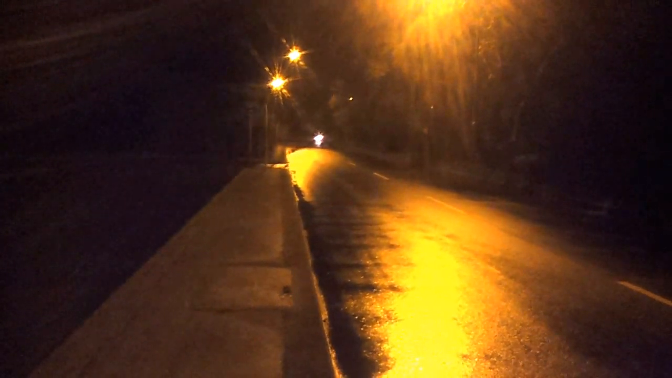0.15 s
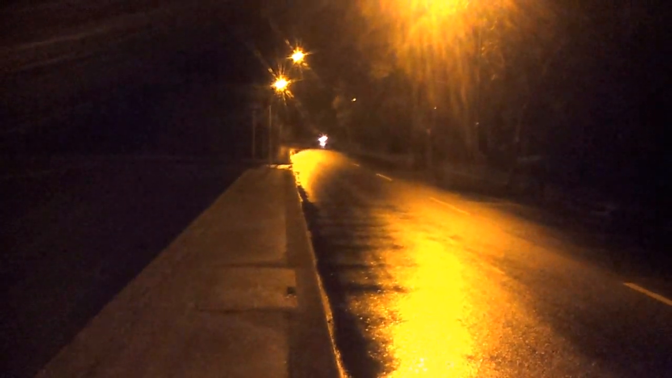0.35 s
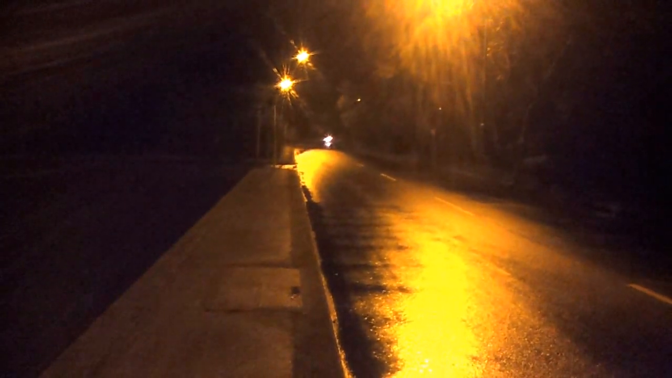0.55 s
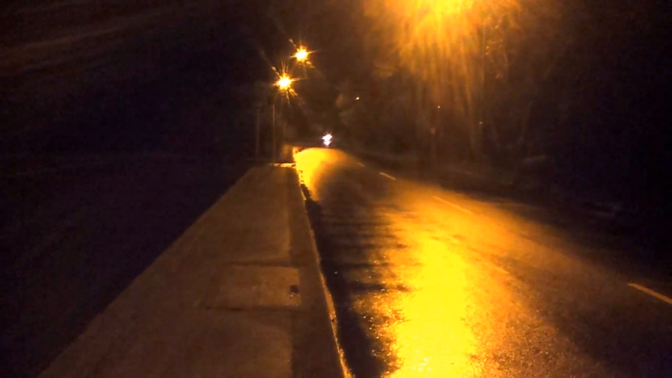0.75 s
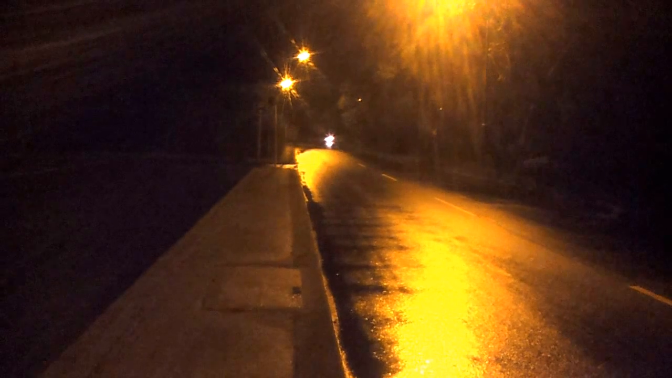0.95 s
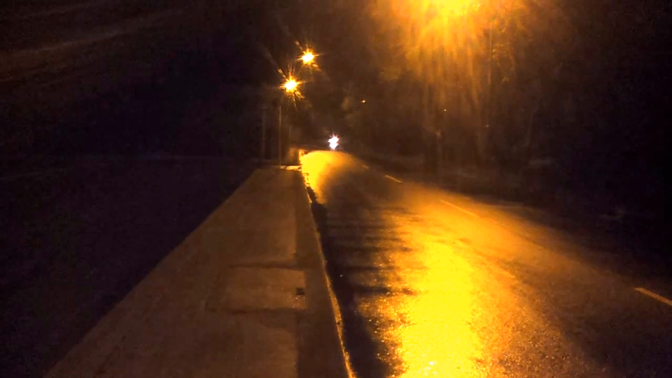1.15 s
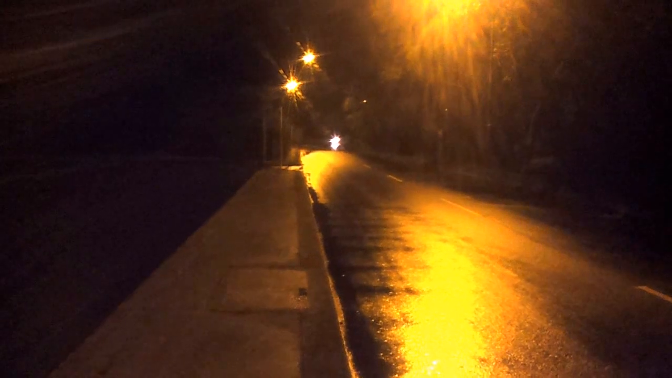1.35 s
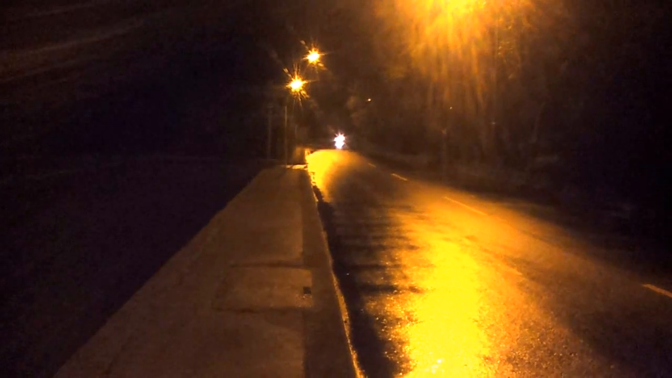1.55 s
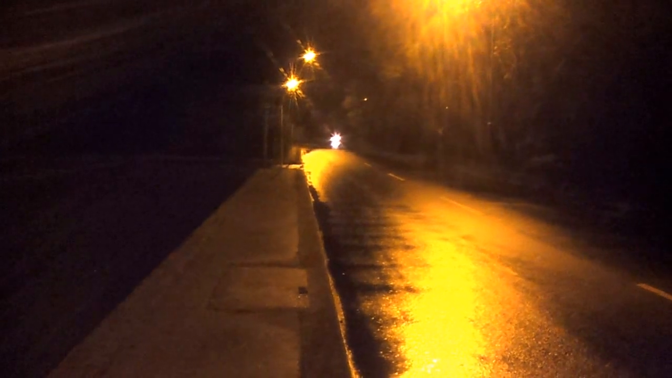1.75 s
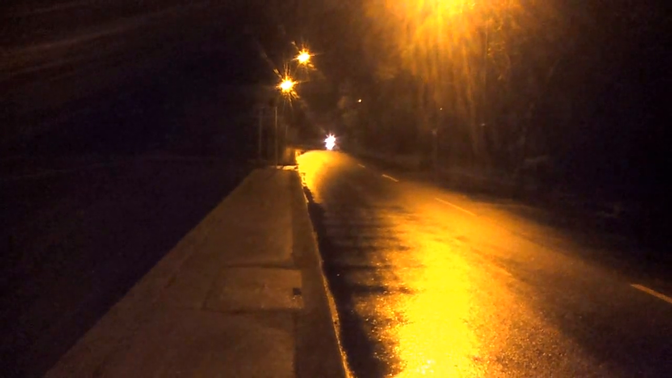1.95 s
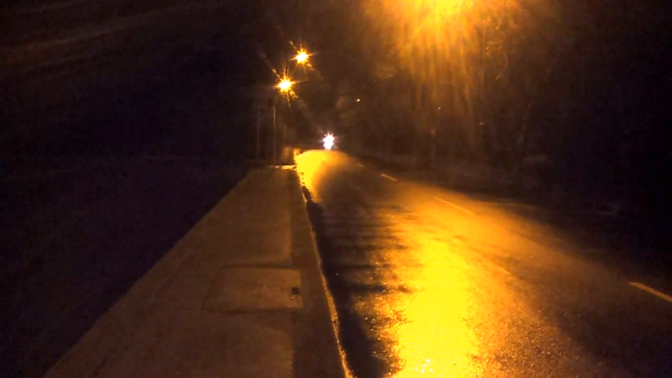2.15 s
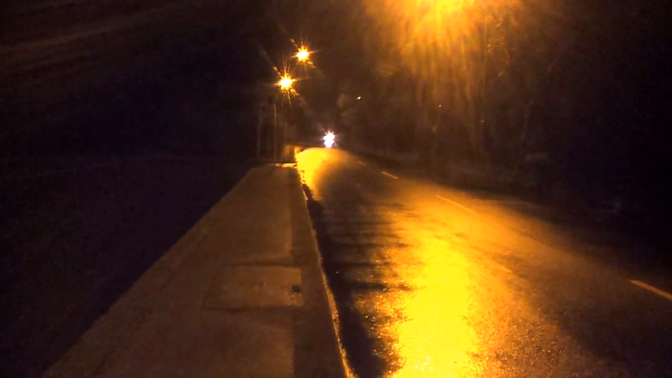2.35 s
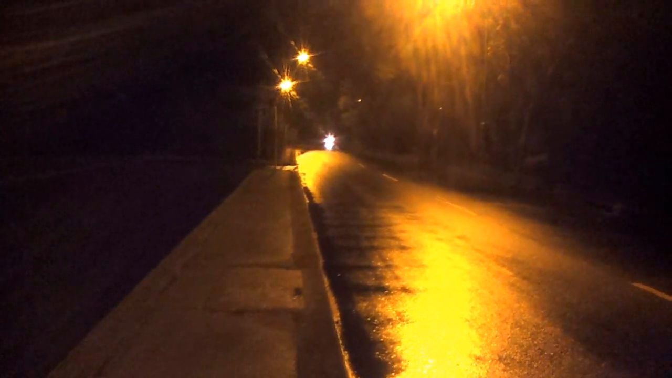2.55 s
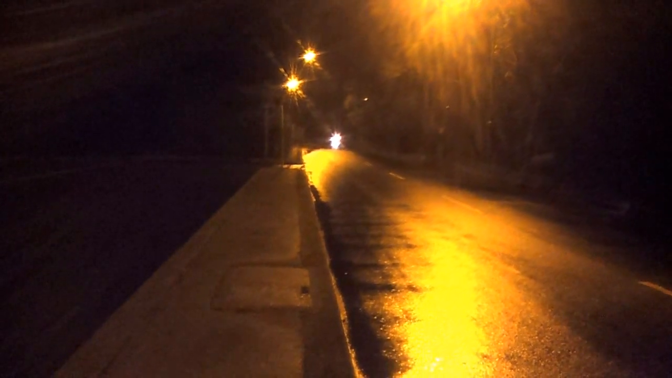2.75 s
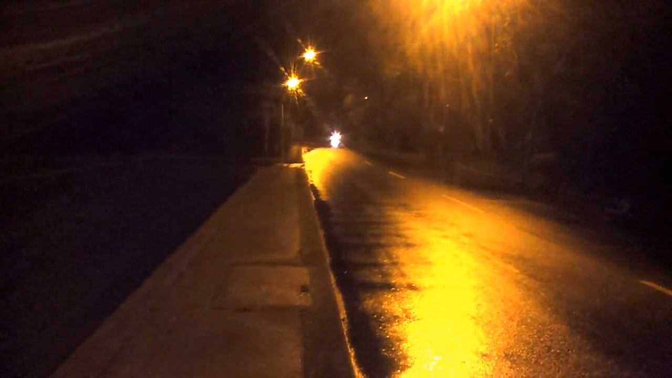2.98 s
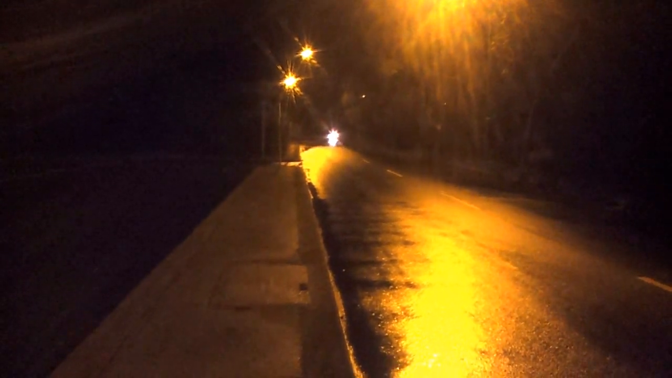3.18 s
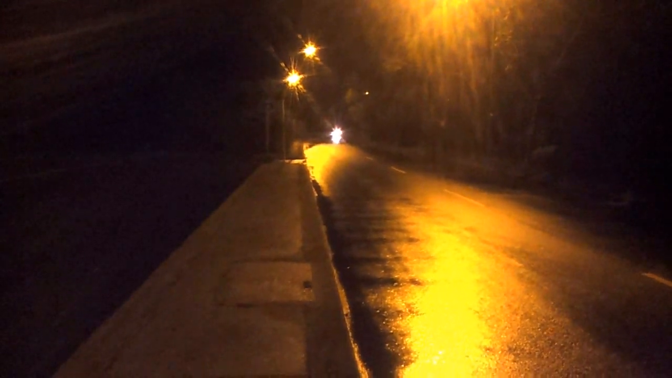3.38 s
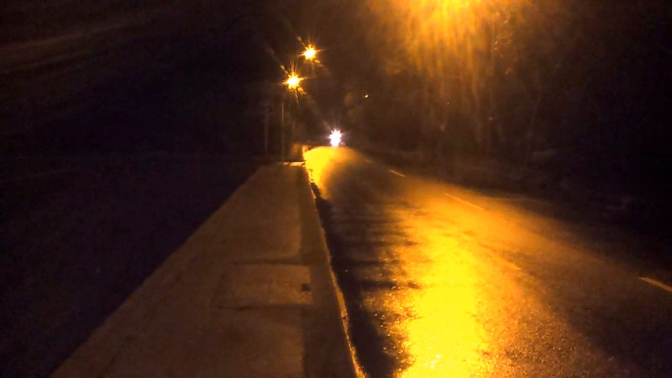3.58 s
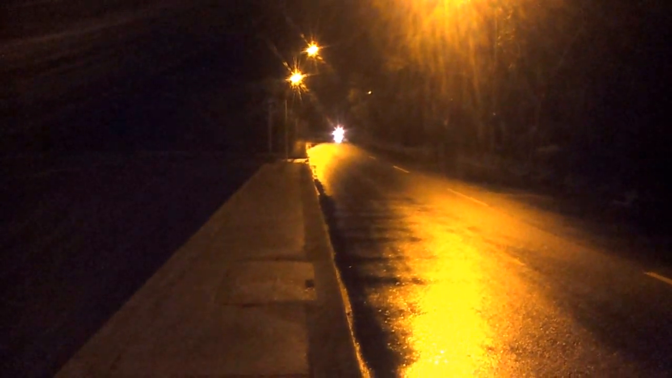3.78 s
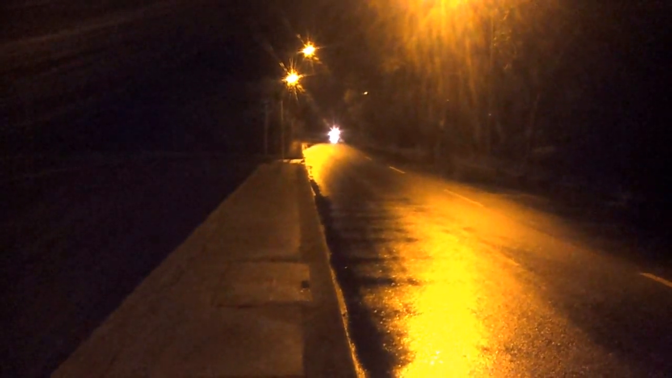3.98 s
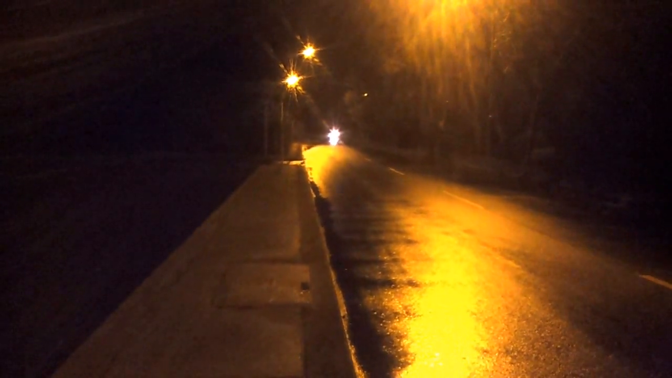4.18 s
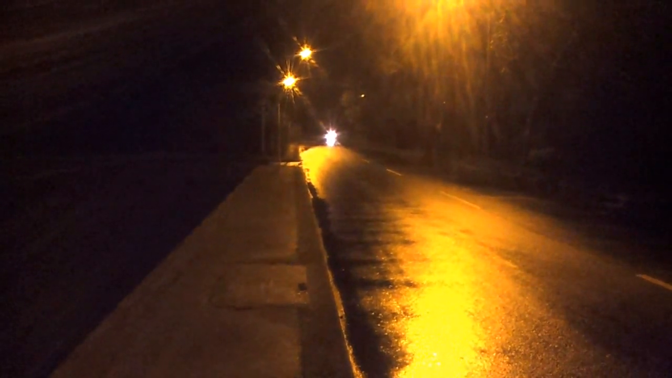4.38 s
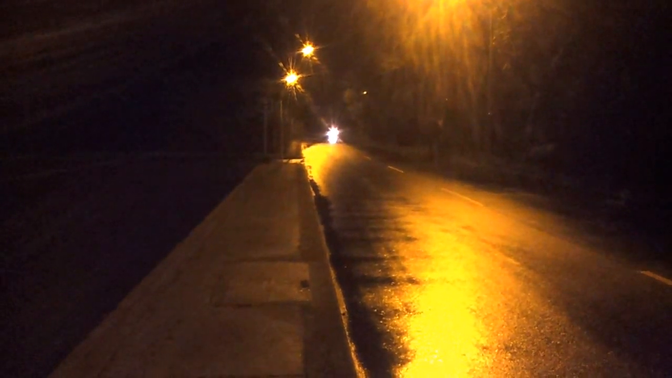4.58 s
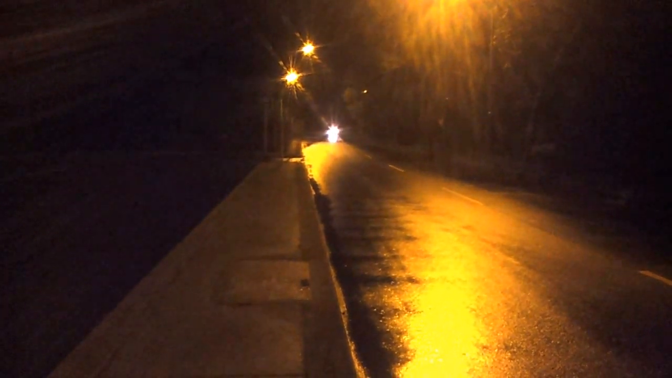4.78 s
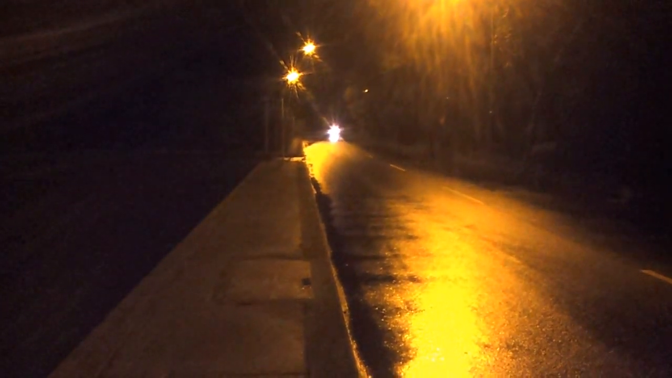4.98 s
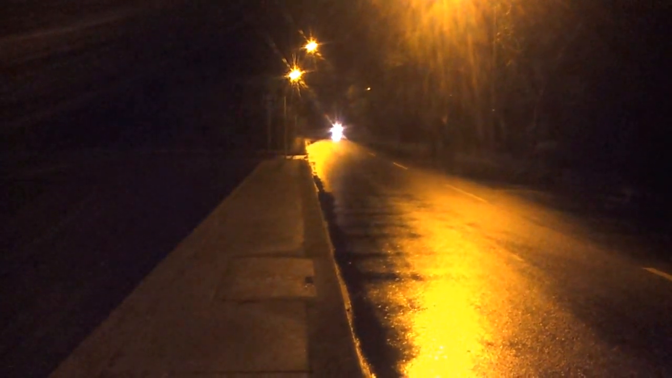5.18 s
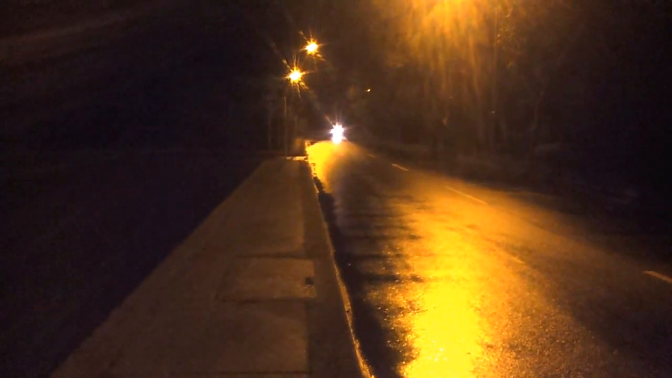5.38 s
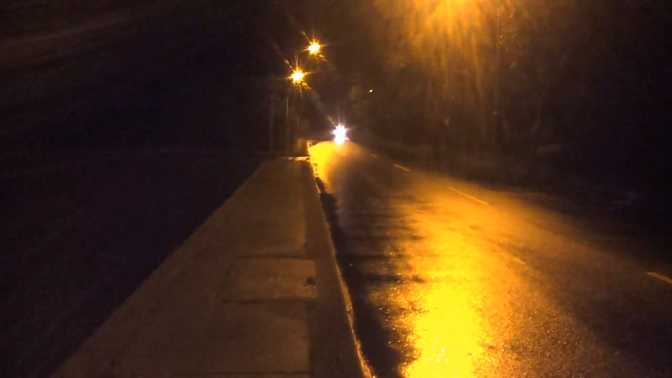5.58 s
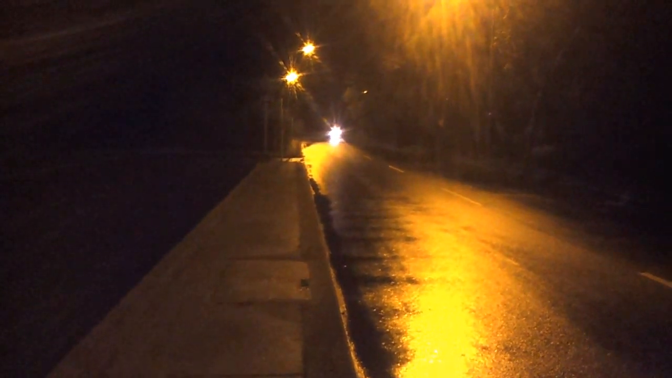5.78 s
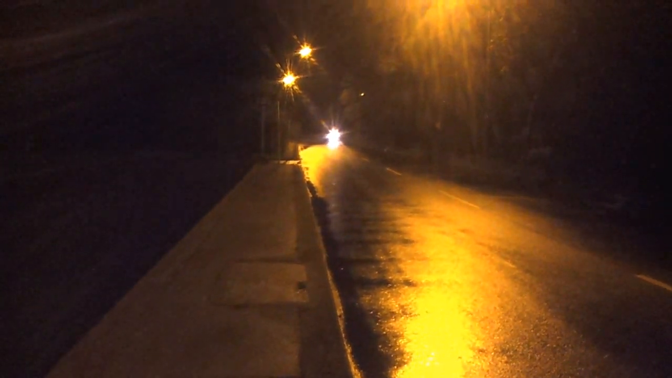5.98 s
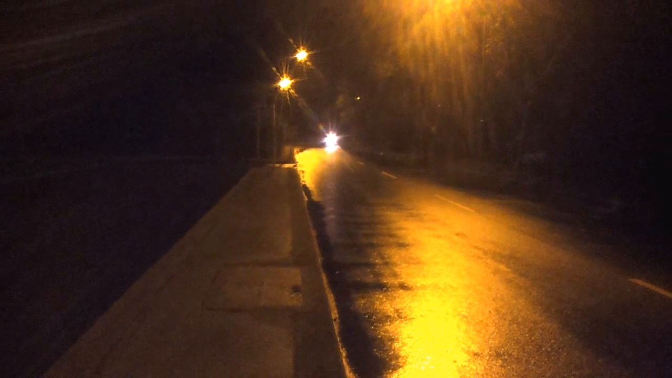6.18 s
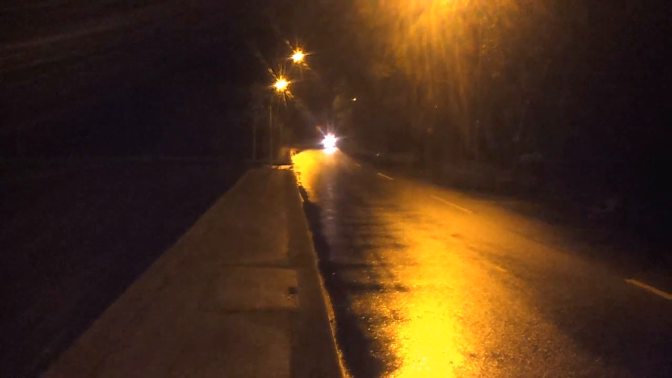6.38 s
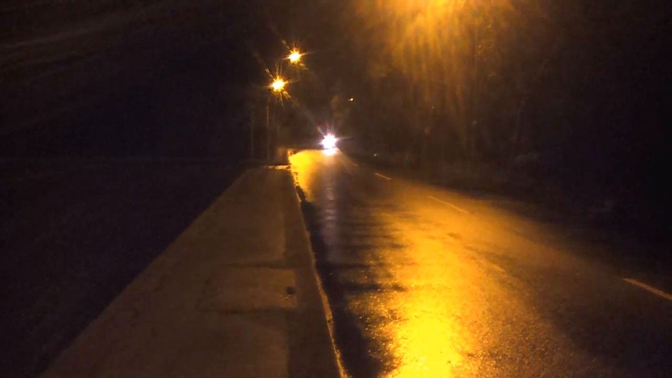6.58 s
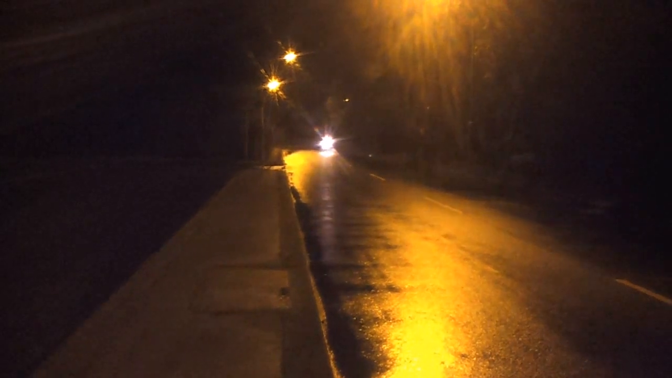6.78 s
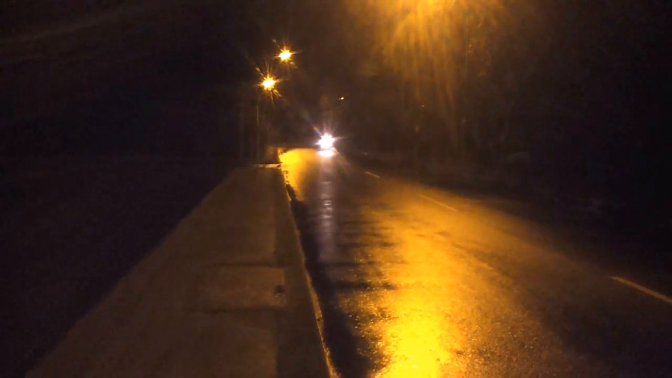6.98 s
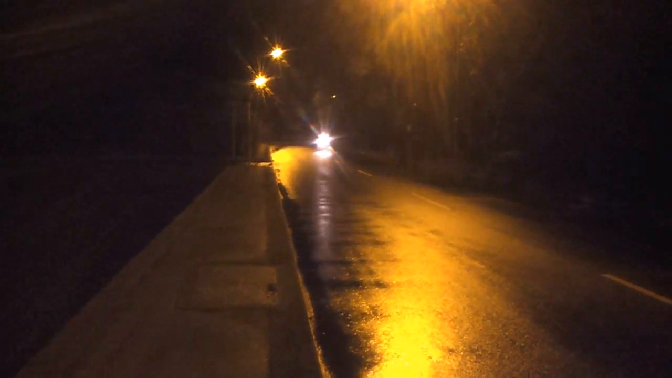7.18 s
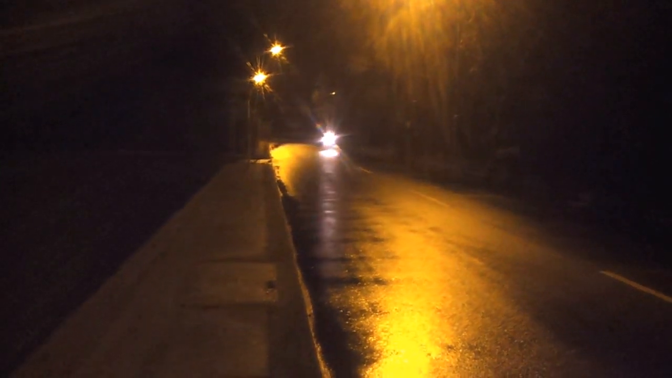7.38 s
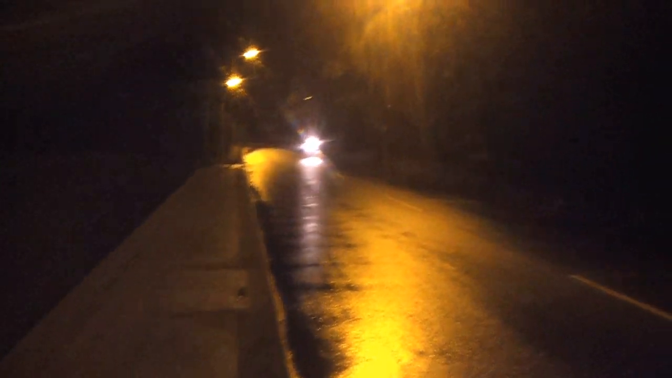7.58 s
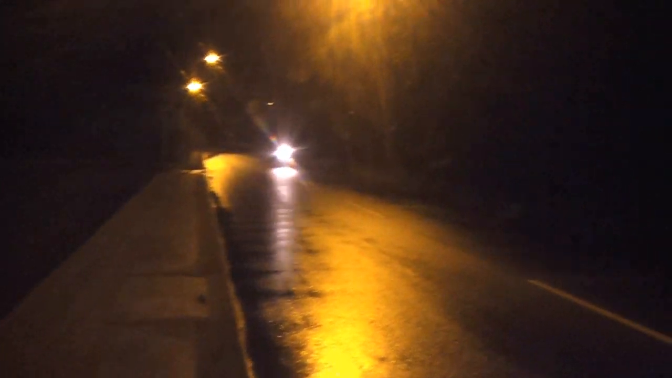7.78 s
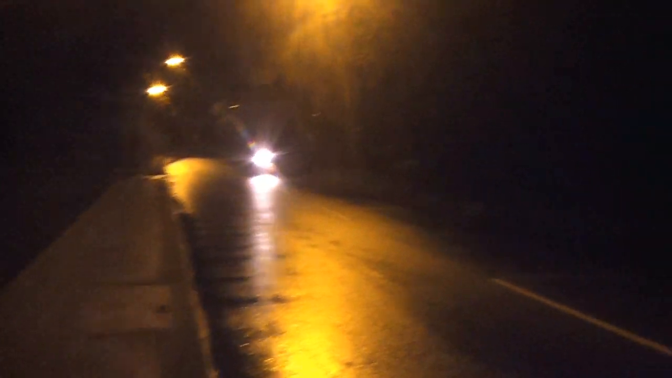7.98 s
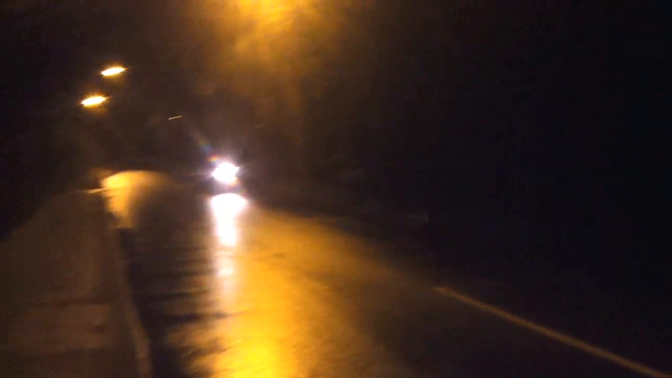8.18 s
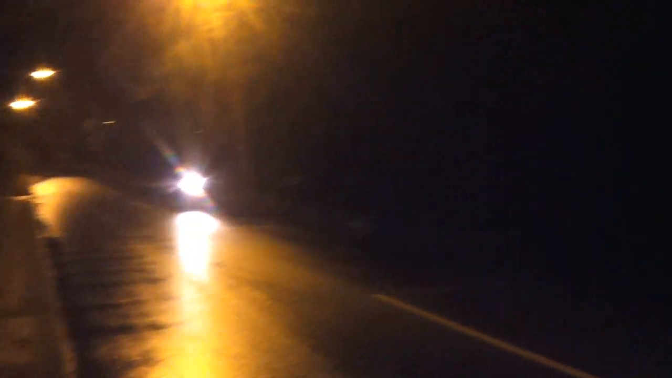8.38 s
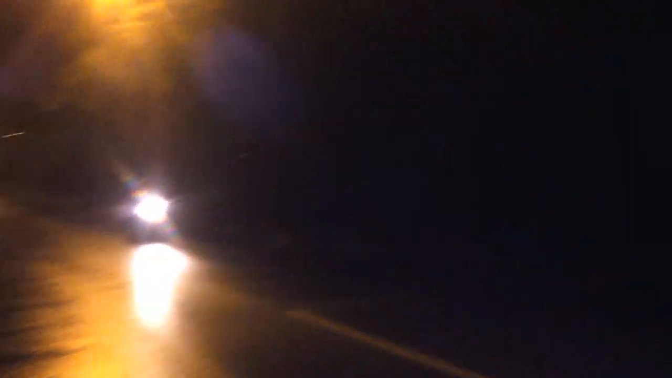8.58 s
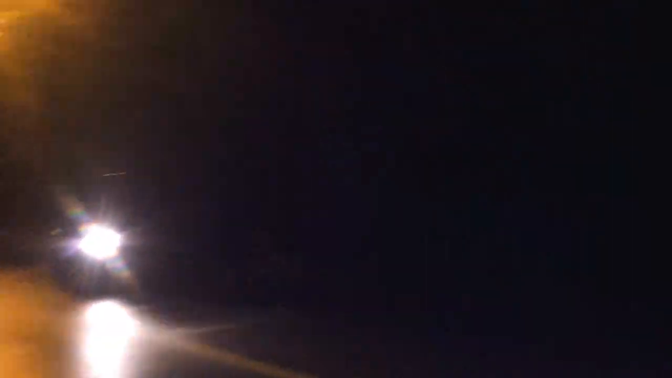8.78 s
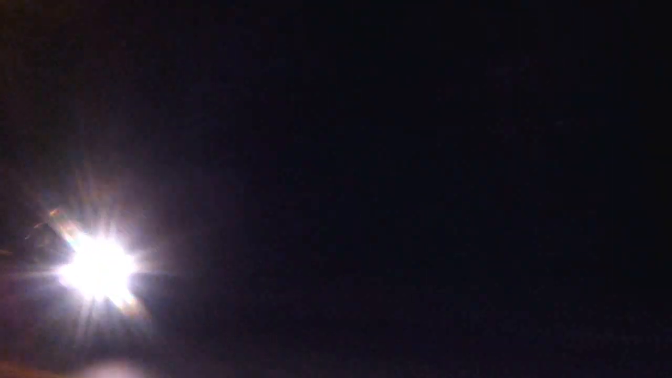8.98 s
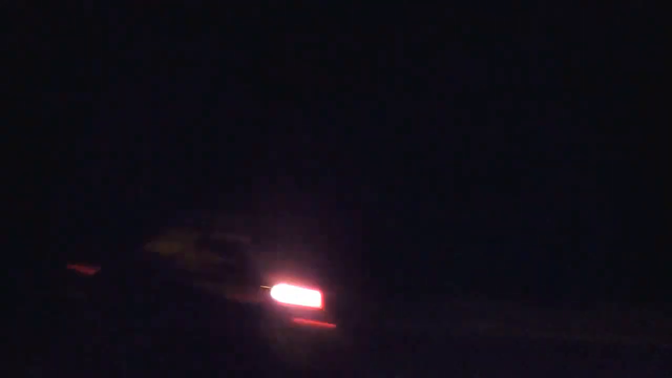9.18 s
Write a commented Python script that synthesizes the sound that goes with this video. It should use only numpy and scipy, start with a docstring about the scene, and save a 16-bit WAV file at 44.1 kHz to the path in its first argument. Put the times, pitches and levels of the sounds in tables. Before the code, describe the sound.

Distant low motorcycle idle, a quick throttle flare, then a long rising high-revving howl approaching through two gear changes, turning raspy and overloaded.

```python
"""A four-cylinder motorcycle idles far down a wet road, pulls away, feathers the throttle, accelerates hard towards
the microphone and shifts up twice. Firing pulses excite pipe resonances (bark) and the silencer's shell (buzz);
sine waves at the low engine orders form the drone, and noise swelling with each firing is the gas rasp. Shaped
noise gives the machine's treble hiss, a murmur and the floor; trees and roadside return echoes. The right channel
is shaded and shifted in phase against the left, and the input stage saturates on loud sound."""
import sys
import numpy as np
from scipy import signal
from scipy.fft import rfft, irfft
from scipy.io import wavfile
from scipy.ndimage import uniform_filter1d, map_coordinates

SR = 44100
rng = np.random.default_rng(int(sys.argv[2]) if len(sys.argv) > 2 else 0)


def write(x):
    x = np.atleast_2d(x).T
    wavfile.write(sys.argv[1], SR, np.round(np.clip(x, -1, 1) * 32767).astype(np.int16))


N = 407484

# Firing rate of the whole engine: start_s, firing_rate_hz
FIRING_RATE = [(0.0, 61.2), (0.2, 60.5), (0.38, 61.7), (0.82, 57.1), (1.11, 59.5), (1.16, 66.1),
               (1.21, 90.7), (1.23, 102.7), (1.29, 124.3), (1.34, 145.0), (1.39, 165.6), (1.52, 207.0),
               (1.64, 249.3), (1.8, 265.3), (2.08, 255.4), (2.18, 228.5), (2.21, 228.9), (2.31, 262.3),
               (2.44, 279.5), (2.65, 277.4), (2.91, 318.4), (3.14, 282.3), (3.37, 309.2), (3.5, 297.3),
               (3.57, 285.8), (3.78, 321.8), (3.99, 335.6), (4.27, 325.6), (4.92, 341.6), (5.14, 328.0),
               (5.64, 391.6), (6.07, 446.1), (6.84, 534.8), (7.36, 580.4), (7.64, 458.8), (7.7, 414.9),
               (7.75, 427.0), (8.47, 442.8), (8.57, 413.2), (8.7, 429.5), (9.24, 397.8)]
# One row per cylinder in firing order, scaled by the imbalance: pulse_db, lateness_firing_periods
CYLINDERS = [(0, 0), (-9, .018), (-3, -.013), (-10, .014)]
# Uneven burning as the throttle shuts or opens: centre_s, length_s, swell_db
BURBLES = [(2.097, 0.072, -41), (2.194, 0.011, -31), (7.397, 0.024, -15.5), (7.578, 0.12, -13),
           (7.61, 0.09, -28), (8.497, 0.089, -21)]
# Twists of the grip: start_s, end_s, bark_change_db, rasp_change_db, drone_change_db
THROTTLE = [(1.2, 1.35, 4.5, 5, 3.5), (1.53, 2.09, 3, 2.5, -1), (2.087, 2.19, -10.5, -1.5, -1),
            (2.218, 2.62, 4, 1.5, -2), (4.27, 4.538, 0.5, 0.5, 3.5), (5.57, 5.94, 3.5, -0.5, -1),
            (7.36, 7.54, -5, 0, 2), (7.537, 7.66, -2, -3, -5), (7.624, 7.844, 1, -4, -1),
            (8.494, 8.823, -6.5, -1, 1)]
# Distance of the machine from the microphone: time_s, distance_m
DISTANCE = [(1.3, 126.5), (3.5, 101.8), (5.1, 85.5), (6.6, 63.5), (8.0, 36), (9.24, 13.9)]

# Exhaust spectra at launch, under way, at hard throttle, after the first shift and close by:
# frequency_hz, relative_level_db
PIPE_LAUNCH = [(50, -2), (140, 8), (300, -6), (470, 7), (660, 6), (850, 1), (1100, 8.5), (1300, 7),
               (1500, 2), (1750, 0.5), (2300, -10), (4300, -18), (8000, -34)]
PIPE_FAR = [(50, -50), (140, -20), (300, 3), (420, 0), (520, 11), (600, 11), (760, -7), (1020, 3),
            (1250, 6), (1480, 4), (1660, 7.5), (1900, 4), (2200, -5), (2500, -9), (3000, -11), (3600, -12),
            (4300, -8.5), (5200, -18), (8000, -30.5)]
PIPE_MID = [(50, -26), (130, -5), (330, -4.5), (540, -1), (650, 0.5), (780, -3.5), (880, -2), (1080, 3),
            (1380, 1.5), (1720, 4.5), (1980, 1), (2200, 0), (3000, -13), (4300, -14), (8000, -30)]
PIPE_SECOND_GEAR = [(50, -26), (130, -5), (330, -5), (650, 0), (760, -4), (880, -1), (1100, 1), (1350, 3),
                    (1520, 3.5), (1750, 1), (2000, -1.5), (2250, -6), (2700, -13), (4300, -13), (8000, -28)]
PIPE_NEAR = [(50, -24), (130, -19), (350, -11), (620, 3), (860, -1), (1100, -9), (1280, -4), (1480, 3),
             (1680, 6.5), (1880, 7), (2050, 1), (2280, 5.5), (2550, -6), (4300, -8), (8000, -17)]
# Spectra of the other layers: frequency_hz, relative_level_db
RASP_SPECTRUM = [(150, -16), (600, -16), (1200, -3.5), (1750, 0.5), (2500, -3), (3200, -2), (4250, -1.5),
                 (5000, -8), (6100, -3.5), (6800, -4), (7700, -6), (11000, -14.5), (15000, -23)]
HISS_SPECTRUM = [(1500, -15.5), (4500, -6.5), (6200, -1.5), (7000, -2.5), (8000, 2), (10000, 2),
                 (12500, -5), (15500, -13.5)]
IDLE_SPECTRUM = [(25, -9), (60, 4), (120, -1), (180, -9), (240, 6), (320, -13), (550, -10), (850, -20),
                 (1200, -17.5), (1600, -26), (4000, -43)]
FLOOR_SPECTRUM = [(100, 4.5), (500, 0.5), (850, -18.5), (1200, -4.5), (1650, -19), (1970, 4.5), (2300, -16),
                  (3800, -13.5), (5000, -7), (7800, -12.5), (15500, -19)]
MURMUR_SPECTRUM = [(20, -5), (45, -4), (100, -8.5), (250, -2), (700, 4), (2000, -59)]
# Response of the pipe to the low engine orders: frequency_hz, response_db
PIPE_LOW = [(80, -38.5), (108, -30), (140, -33.5), (170, -28.5), (215, -24), (280, -22), (350, -27),
            (400, -20), (435, -22), (470, -17), (495, -15.5), (555, -20.5), (605, -16.5), (670, -19.5),
            (750, -25.5), (860, -25.5), (1000, -20.5), (1300, -18), (1700, -6.5)]
# Clean low orders: multiple_of_firing_rate
LOW_ORDERS = (.25, .5, 1, 1.75, 2, 3)
# Their strengths under way, and while the clutch slips: order_db
LOW_ORDERS_DB = (-2, -14.5, 0.5, -18.5, -4.5, -12)
LAUNCH_ORDERS_DB = (-28, -8.5, -8.5, -51, -12, -6.5)

# Attenuation of the right channel against the left, far and close: frequency_hz, attenuation_db
SHADE_FAR = [(60, 5), (110, 11.5), (200, 6.5), (380, 6), (700, 5), (1290, 1), (2380, -1.5), (4400, 0.5),
             (7500, 6.5), (8200, 6), (8800, 27.5), (15000, 13)]
SHADE_NEAR = [(60, 11), (450, 4), (1220, 4), (2010, 1), (4400, -1), (5500, 0.5), (9080, 13.5), (15000, 15)]
# Phase lag of the right channel against the left, far and close: frequency_hz, lag_rad
LAG_FAR = [(260, 2.9), (600, 2.8), (850, 2.95), (1120, 2.5), (1400, 2.55), (1700, 2.8), (2200, 3.5),
           (2800, 3.9), (4000, 4.8), (4900, 6.3), (5600, 8.3), (6500, 10.5), (8500, 11.8), (11000, 15.9)]
LAG_NEAR = [(260, 2.15), (650, 2.25), (1000, 1.7), (1750, 0.15), (2200, 0.3), (3000, -0.3), (4500, -1.3),
            (6000, -2.5), (8000, -4.3), (12000, -9)]
# Reverberation time of the roadside: frequency_hz, t60_s
ROADSIDE_T60 = [(150, 0.16), (1500, 0.29), (10000, 0.14)]

# Growth of each layer: level_at_reference_db, db_per_halving_of_distance, db_per_octave_of_revs,
# extra_at_full_throttle_db
BARK_LAW = (-38.5, 8.5, 6.5, 0.5)
RASP_LAW = (-39, 10, 6.5, 3)
HISS_LAW = (-44.5, 4.5, 10.5, -2)
MURMUR_LAW = (-42.5, 8, -2.5, 3.5)
DRONE_LAW = (0.98, 6.2, 0.34, 0.5)
REFERENCE_M, REFERENCE_HZ = 100, 300
FULL_THROTTLE_S = (4.7, 5.6)  # the rider winds it open between these times
HISS_LOSS_DB_PER_M = 0.3381  # the treble hiss fades fast with distance
HISS_FLUTTER_DB = .6
PATCHY_DB = 1.4  # rms depth of the drifting patches in rasp, hiss and buzz

WRIST_S, FLYWHEEL_S = 0.091, .045  # time to move the throttle; time over which the revs round off
CRANK_WANDER = .008  # scale of uneven turning, in firing periods
FLARE_DB = 0.5  # scale of the bark's flares and sags at hard throttle
MELLOW = 0.62  # dB lost per order above the first, per dB of bark lost, when the throttle shuts
LOPE_DB, LOPE_HZ = 19.5, (380, 570)  # once-per-cycle thump: weakening at low revs; firing rates where it comes in
RING_DB, RING_HZ = 8.5, (169, 263)  # highest clean order: the same
LUG_DB, LUG_HZ = 6.5, (150, 216)  # firing tone: gain at low revs; firing rates over which that fades
DISPERSION = 1  # phase delay of higher orders in the pipe, in radians per order squared
SILENCER_T60_S, BUZZ_DB = .028, -5  # ring of the shell; its level against the rasp

ASIDE_M = (48.5, 21.5)  # between these distances the machine swings to the side of the microphone
TREE_SPACING_M, TREE_ASIDE_M = 8, (6, 15)
TREE_SIZE_M = 2.1  # how much sound each tree throws back
SOUND_M_PER_S = 343
PORT_LAG_S = .00035  # upper limit of the random delay of a tree's echo in each channel
SELF_NOISE_DB, TOP_HZ = -54, 15600  # hiss of the input stage; its band limit


def amp(db):
    """Level and amplitude: 20 dB is a factor of ten."""
    return np.exp(np.asarray(db) * (np.log(10) / 20))


def unit(x):
    """Normalisation to rms 1."""
    return x / np.sqrt(np.mean(x ** 2) + 1e-20)


def along(points, hz):
    """Interpolation of a spectrum on a logarithmic frequency axis."""
    f, v = np.transpose(points)
    return np.interp(np.log(hz + 1), np.log(np.abs(f) + 1), v)


def curve(rows):
    """Linear interpolation of timed values, one per sample."""
    s, value = np.transpose(rows)
    return np.interp(np.arange(N) / SR, s, value)


def ramp(start, end):
    """Linear rise from 0 to 1 between two times in seconds."""
    return np.interp(np.arange(N) / SR, [start, end], [0, 1])


def wobble(rate):
    """Slow random modulation: a smooth curve through `rate` random knots a second."""
    coarse = np.arange(0, N + 64, 64)
    knots = rng.standard_normal(int(N * rate / SR) + 4)
    return np.interp(np.arange(N), coarse, map_coordinates(knots, [coarse * rate / SR]))


def noise(channels):
    """White noise, uncorrelated between channels."""
    return rng.standard_normal((channels, N), dtype=np.float32)


def convolved(x, ring):
    """Linear superposition: every channel of x through one impulse response."""
    return signal.oaconvolve(np.atleast_2d(x).astype(np.float32), ring[None].astype(np.float32), axes=1)


def filtered(x, response):
    """Frequency response applied by a windowed impulse response, with its delay removed."""
    size = 1024
    ring = np.roll(irfft(response(np.fft.rfftfreq(size, 1 / SR))), size // 2) * np.hanning(size)
    return convolved(x, ring)[:, size // 2:size // 2 + N]


def coloured(x, spectrum):
    """Minimum-phase filtering: folding the cepstrum makes the spectrum causal; the result has rms 1."""
    size = 2048
    cepstrum = irfft(np.log(amp(along(spectrum, np.fft.rfftfreq(size, 1 / SR)))))
    cepstrum[1:size // 2] *= 2
    cepstrum[size // 2 + 1:] = 0
    ring = irfft(np.exp(rfft(cepstrum)))
    return unit(convolved(x, ring)[:, :N])


def patchy(x):
    """Spectral modulation: a smoothed random field over time and frequency drifts the colour of x."""
    z = signal.stft(x, nperseg=512)[2]
    field = rng.standard_normal(z.shape[1:])
    field = uniform_filter1d(field, size=4, axis=0)  # over frequency
    field = uniform_filter1d(field, size=24, axis=1)  # over time
    return signal.istft(z * amp(PATCHY_DB * unit(field)), nperseg=512)[1][:, :N]


def level(law, metres, rate):
    """Power laws of distance and revs, in dB, with an extra at full throttle."""
    base_db, nearer_db, revs_db, throttle_db = law
    distance_db = nearer_db * np.log2(REFERENCE_M / metres)
    speed_db = revs_db * np.log2(rate / REFERENCE_HZ)
    return base_db + distance_db + speed_db + throttle_db * ramp(*FULL_THROTTLE_S)


def throttle():
    """Load control: dB that bark, rasp and drone gain or lose as the rider twists or eases the grip."""
    step = lambda s: ramp(s - WRIST_S / 2, s + WRIST_S / 2)
    return sum(np.outer(change_db, step(start) - step(end)) for start, end, *change_db in THROTTLE)


def right_channel(x, aside):
    """Interchannel difference: frequency-dependent shade and phase lag slide as the source swings aside."""
    hz, t, z = signal.stft(x, SR, nperseg=512)
    swing = np.interp(t * SR, np.arange(N), aside)
    between = lambda far, near: np.outer(along(far, hz), 1 - swing) + np.outer(along(near, hz), swing)
    shade = amp(-between(SHADE_FAR, SHADE_NEAR))
    lag = np.exp(-1j * between(LAG_FAR, LAG_NEAR))
    return signal.istft(z * shade * lag, nperseg=512)[1][..., :N]


def microphone(pair, aside):
    """Directional incidence: sound from down the road reaches both channels."""
    return np.vstack([pair[0], right_channel(pair[1], aside)])


def diffuse(pair, aside):
    """Diffuse-field coherence: sound from all around is alike in the bass, mostly unrelated in the treble."""
    coherence = [(50, 1.0), (300, 0.59), (1500, 0.3), (4000, 0.19), (8000, 0.19)]  # (Hz, share)
    alike = lambda hz: np.clip(along(coherence, hz), 0, 1)
    unlike = lambda hz: np.sqrt(1 - alike(hz) ** 2)
    right = filtered(pair[0], alike) + filtered(pair[1], unlike)
    return np.vstack([pair[0], right_channel(right, aside)])


def floor():
    """Stationary background: noise of fixed spectrum and level."""
    return amp(-47.0) * coloured(noise(2), FLOOR_SPECTRUM)


def murmur(murmur_db):
    """Band-shaped noise: broad low and middle noise, strongest near 700 Hz, with slow random level changes."""
    return amp(murmur_db + 1.1 * wobble(4.5)) * coloured(noise(2), MURMUR_SPECTRUM)


def hiss(hiss_db, metres):
    """Distance attenuation: the machine's treble noise follows the revs and loses extra dB per metre."""
    loss_db = HISS_LOSS_DB_PER_M * (metres - REFERENCE_M)
    return amp(hiss_db - loss_db + HISS_FLUTTER_DB * wobble(10)) * coloured(noise(2), HISS_SPECTRUM)


def roadside(x):
    """Reverberation: trees and banks scatter a short, dull echo, as exponentially decaying noise."""
    hz, t, z = signal.stft(rng.standard_normal(SR // 3), SR, nperseg=256)
    decay = amp(-60 * t / along(ROADSIDE_T60, hz)[:, None])
    tail = signal.istft(z * decay, SR, nperseg=256)[1]
    return convolved(x, tail / np.linalg.norm(tail))[:, :N]


def reflected(x, metres):
    """Moving-source interference: each tree's echo changes path and Doppler shift, so harmonics beat."""
    n, heard = np.arange(N), np.vstack([x, x])
    road = metres[::256]
    for place in np.arange(0, 140, TREE_SPACING_M):
        along_m, aside_m = place + rng.uniform(0, TREE_SPACING_M), rng.uniform(*TREE_ASIDE_M)
        to_tree, to_microphone = np.hypot(road - along_m, aside_m), np.hypot(along_m, aside_m)
        # delay and gain are relative to the direct sound
        late = np.interp(n, n[::256], (to_tree + to_microphone - road) / SOUND_M_PER_S)
        gain = np.interp(n, n[::256], TREE_SIZE_M * road / (to_tree * to_microphone))
        echo = gain * np.interp(n - SR * late, n, x[0])
        for channel, lag in zip(heard, (SR * PORT_LAG_S * rng.random(2)).astype(int)):
            channel[lag:] += echo[:N - lag]
    return heard


def firings(turns, imbalance, scatter_db, jitter):
    """Pulse train: one band-limited pulse per firing, with cylinder differences and random burns."""
    index = np.arange(1, int(turns[-1]))
    db, late = imbalance * np.array(CYLINDERS)[index % len(CYLINDERS)].T
    chance = rng.standard_normal((len(index), 2))
    at = np.interp(index + late + jitter * chance[:, 0], turns, np.arange(N))
    # the root of the period keeps the power even as the rate changes
    size = amp(db + scatter_db * chance[:, 1]) * np.sqrt(np.abs(np.gradient(at)))
    # windowed sinc pulses fall between samples
    taps = at.astype(int)[:, None] + np.arange(-7, 9)
    offset = taps - at[:, None]
    shape = np.sinc(offset) * np.cos(np.pi * offset / 16) ** 2
    pulses = np.bincount(np.clip(taps, 0, N - 1).ravel(), (size[:, None] * shape).ravel(), N)
    return unit(pulses - uniform_filter1d(pulses, SR // 20))


def overtones(x, turns):
    """Synchronous demodulation removes half the firing rate and the first three harmonics."""
    for order in (.5, 1, 2, 3):
        carrier = np.exp(2j * np.pi * order * turns)
        x = x - 2 * np.real(carrier * uniform_filter1d(x / carrier, SR // 20))
    return x


def puffs(turns, depth, channels):
    """Modulated turbulence: gas noise swells with every firing."""
    swell = np.exp(depth * np.cos((2 * np.pi * turns).astype(np.float32)))
    return unit(noise(channels) * swell)


def rasp(turns, rasp_db):
    """Jet noise: the pulsating gas stream, given the rasp's spectrum."""
    gas = puffs(turns, depth=.35, channels=2)
    return amp(rasp_db + 0.76 * wobble(10)) * coloured(gas, RASP_SPECTRUM)


def metallic(x):
    """Modal density: many close, short-lived silencer modes, as decaying noise, spread pulses into a buzz."""
    t = np.arange(int(SILENCER_T60_S * SR)) / SR
    ring = rng.standard_normal(len(t)) * amp(-60 * t / SILENCER_T60_S)
    return convolved(x, ring)[:, :N]


def buzz(turns, rasp_db):
    """Forced vibration: the pulses rattle the silencer, giving fine engine lines high in the rasp."""
    pulses = firings(turns + CRANK_WANDER * wobble(40), imbalance=1.3, scatter_db=1, jitter=.004)
    shell = patchy(metallic(overtones(pulses, turns)))
    return amp(rasp_db + BUZZ_DB) * coloured(shell, RASP_SPECTRUM)


def burbles(turns):
    """Subharmonic: only every other cylinder catches, a short boom an octave under the note."""
    swell = np.zeros(N)
    for s, length, db in BURBLES:
        arch = np.sin(np.linspace(0, np.pi, int(length * SR)))
        swell[int((s - length / 2) * SR):][:len(arch)] += amp(db) * arch
    boom = coloured(noise(1), [(40, -21), (130, 7.0), (300, -9), (700, 5.5), (3000, -85)])  # (Hz, dB)
    return swell * (1.34 * np.cos(np.pi * turns) + 0.91 * boom)


def idle(turns):
    """Low-load pulse train: soft, slightly lumpy pulses until the throttle opens."""
    beat = firings(turns, imbalance=.12, scatter_db=1.1, jitter=.012) + .3 * unit(noise(1))
    resting = 1 - ramp(1.15, 1.4)
    return amp(-45.0) * coloured(beat, IDLE_SPECTRUM) * resting


def drone(turns, rate, drone_db, twist_db):
    """Resonance: the pipe passes low orders as clean pressure waves that swell at its resonances."""
    phase = 2 * np.pi * (turns + .008 * wobble(60))
    gripping, waves = ramp(2.15, 2.43), np.zeros(N)  # the clutch grips
    for order, db, launch_db in zip(LOW_ORDERS, LOW_ORDERS_DB, LAUNCH_ORDERS_DB):
        clutch_db = gripping * db + (1 - gripping) * launch_db
        shut_db = MELLOW * max(order - 1, 0) * np.minimum(twist_db, 0)
        waver_db = (1.65 + 0.5 * abs(order - 1)) * wobble(34)
        lope_db = np.interp(rate, LOPE_HZ, [-LOPE_DB, 0]) * (order == min(LOW_ORDERS))
        ring_db = np.interp(rate, RING_HZ, [-RING_DB, 0]) * (order == max(LOW_ORDERS))
        lug_db = np.interp(rate, LUG_HZ, [LUG_DB, 0]) * (order == 1)
        order_db = clutch_db + shut_db + waver_db + lope_db + ring_db + lug_db
        wave = np.sin(order * phase - DISPERSION * order ** 2)
        waves += amp(order_db + along(PIPE_LOW, order * rate)) * wave
    return amp(drone_db) * waves * ramp(1.1, 1.12)


def bark(turns, bark_db, close):
    """Source and filter: pulses ring the exhaust above the drone, its resonances changing along the run."""
    under_way, hard, shifted = ramp(1.86, 3.1), ramp(5.5, 6.6), ramp(7.4, 7.8)
    # a wide-open throttle makes the crank turn unevenly and the gas stream rougher
    turns = turns + CRANK_WANDER * (hard + shifted) * (1 - close) * wobble(50)
    pulses = firings(turns, imbalance=1.2, scatter_db=.6, jitter=.004)
    roughness = .05 + .11 * hard + .15 * shifted - .21 * close
    blast = overtones(pulses, turns) + roughness * puffs(turns, depth=.6, channels=1)
    sound = amp(5.5) * coloured(blast, PIPE_LAUNCH)
    stages = [(under_way, 7.5, PIPE_FAR), (hard, 9.5, PIPE_MID),
              (shifted, 8.0, PIPE_SECOND_GEAR), (close, 8.5, PIPE_NEAR)]
    for share, db, pipe in stages:
        sound = (1 - share) * sound + share * amp(db) * coloured(blast, pipe)
    flare_db = FLARE_DB * hard * wobble(14)
    return amp(bark_db + flare_db) * sound


def scene():
    """Superposition: revs, distance and throttle drive the layers of the machine over a steady floor."""
    rate = uniform_filter1d(curve(FIRING_RATE), int(FLYWHEEL_S * SR))
    turns = np.cumsum(rate) / SR  # firings so far
    metres = curve(DISTANCE)
    moving, close = ramp(1.09, 1.41), ramp(8.55, 9.09)
    aside = np.interp(metres, ASIDE_M[::-1], [1, 0]) ** 2

    bark_twist_db, rasp_twist_db, drone_twist_db = throttle()
    bark_db = level(BARK_LAW, metres, rate) + bark_twist_db
    rasp_db = level(RASP_LAW, metres, rate) + rasp_twist_db
    drone_db = level(DRONE_LAW, metres, rate) + drone_twist_db

    snarl = reflected(moving * bark(turns, bark_db, close), metres) + idle(turns)
    exhaust = snarl + drone(turns, rate, drone_db, bark_twist_db) + burbles(turns)
    exhaust = exhaust + moving * buzz(turns, rasp_db)
    echo = amp(-6.5 - 0.7 * close) * np.vstack([roadside(channel) for channel in snarl])
    treble = patchy(rasp(turns, rasp_db) + hiss(level(HISS_LAW, metres, rate), metres))
    middle = murmur(level(MURMUR_LAW, metres, rate))
    surroundings = moving * (treble + middle) + echo + floor()
    return microphone(exhaust, aside) + diffuse(surroundings, aside)


def record(dry):
    """Saturation: the input stage hisses faintly, limits smoothly at 0.87 and cuts the band at its top."""
    hardness = 6
    dry = dry + amp(SELF_NOISE_DB) * noise(2)
    clipped = dry / (1 + np.abs(dry.astype(np.float32) / 0.87) ** hardness) ** (1 / hardness)
    return filtered(clipped, lambda hz: 1.0 * (hz < TOP_HZ))


dry = scene()
out = record(dry)
write(out)
```